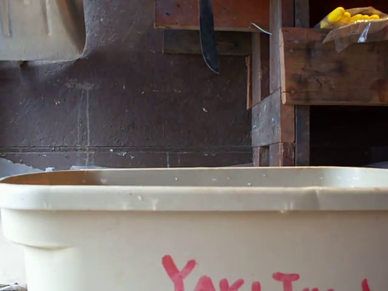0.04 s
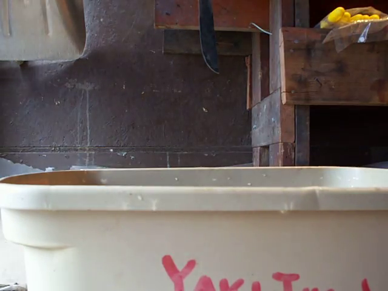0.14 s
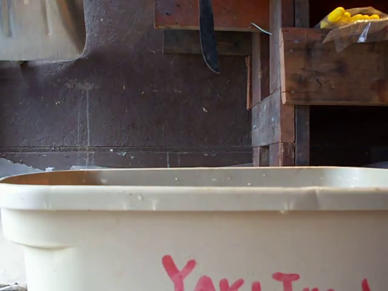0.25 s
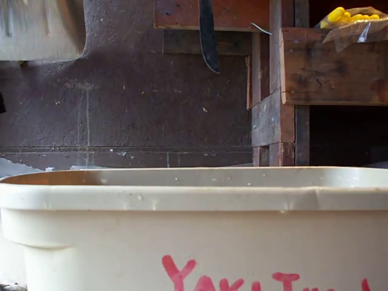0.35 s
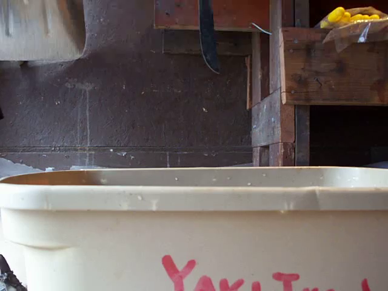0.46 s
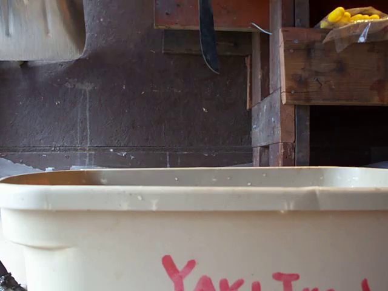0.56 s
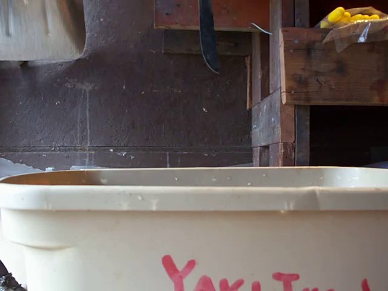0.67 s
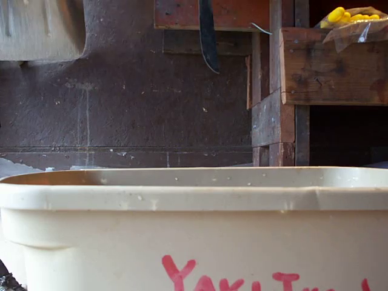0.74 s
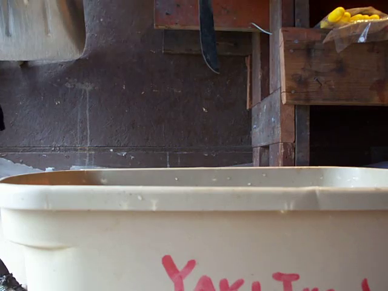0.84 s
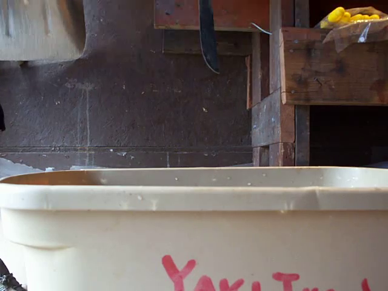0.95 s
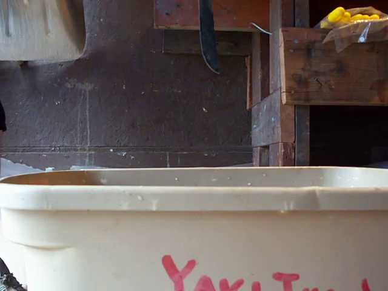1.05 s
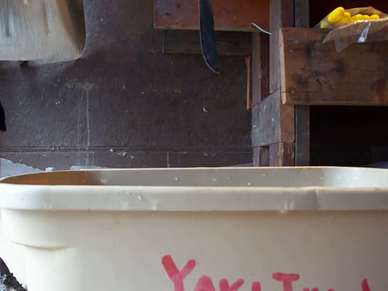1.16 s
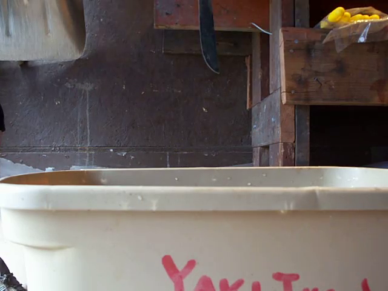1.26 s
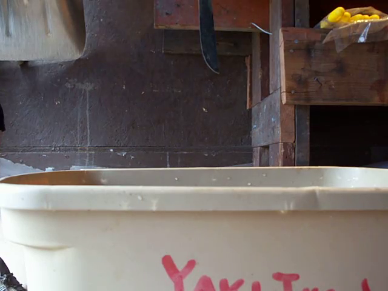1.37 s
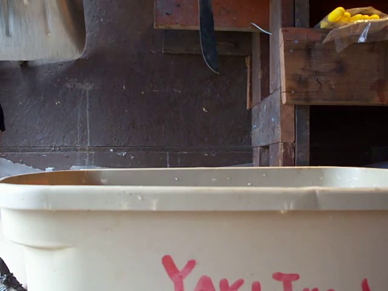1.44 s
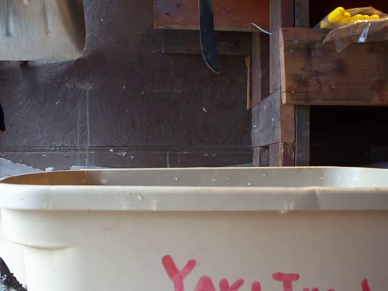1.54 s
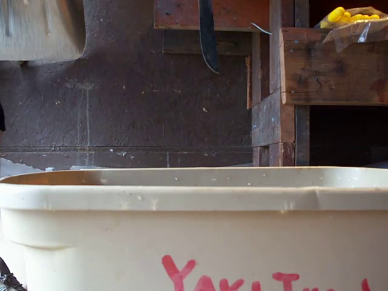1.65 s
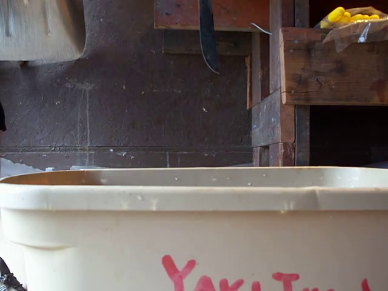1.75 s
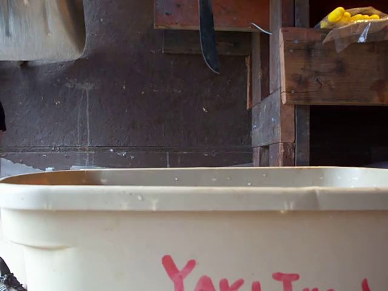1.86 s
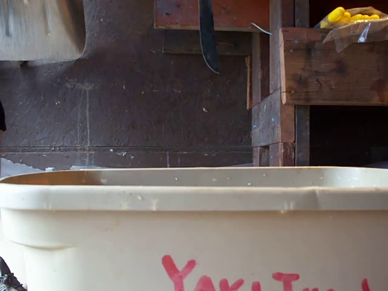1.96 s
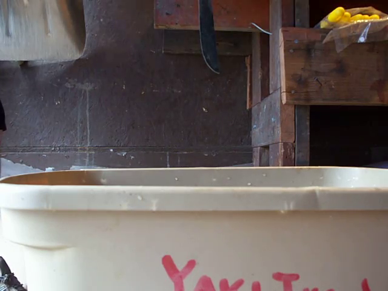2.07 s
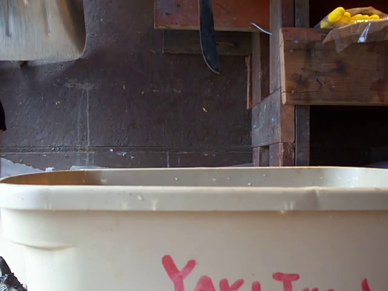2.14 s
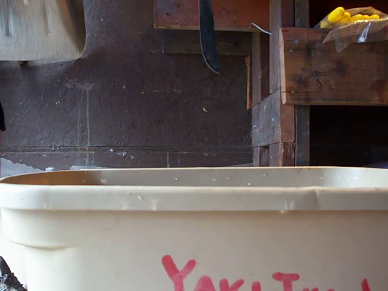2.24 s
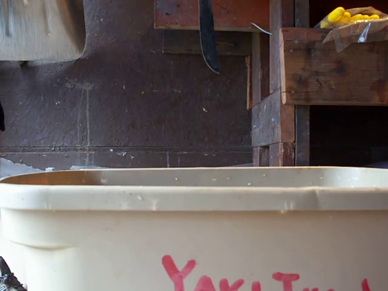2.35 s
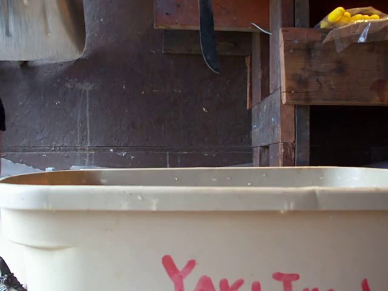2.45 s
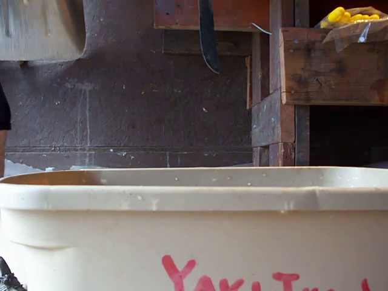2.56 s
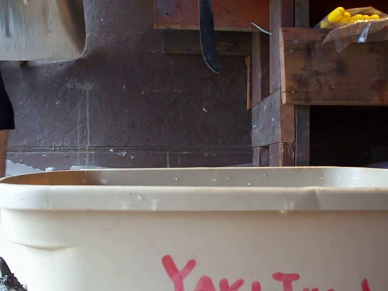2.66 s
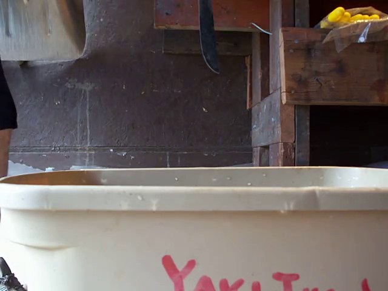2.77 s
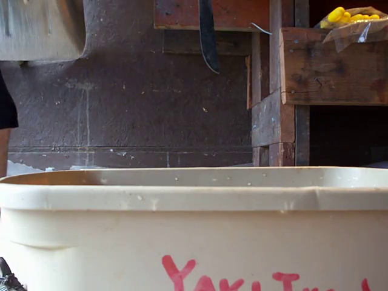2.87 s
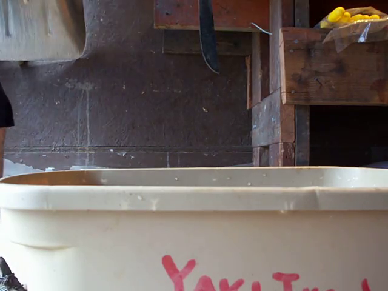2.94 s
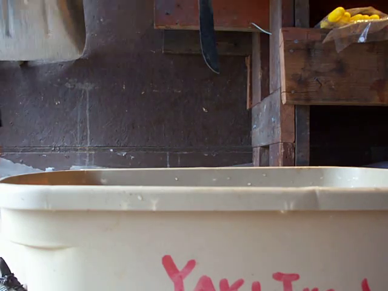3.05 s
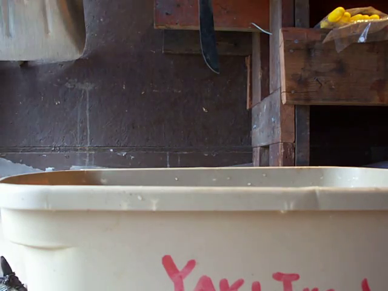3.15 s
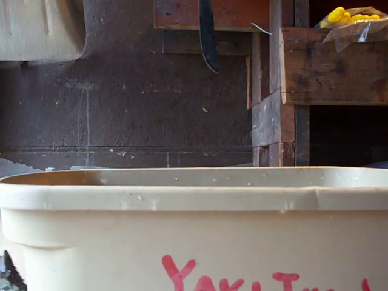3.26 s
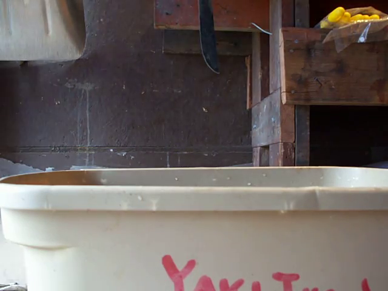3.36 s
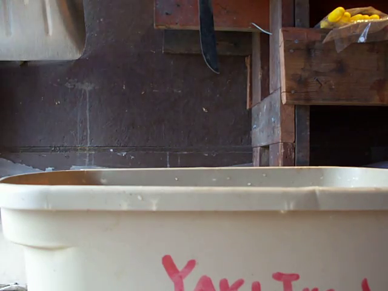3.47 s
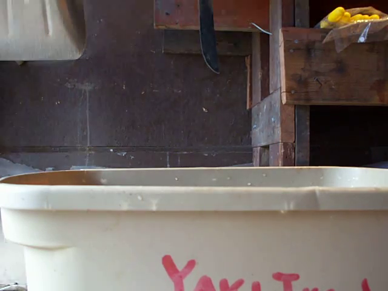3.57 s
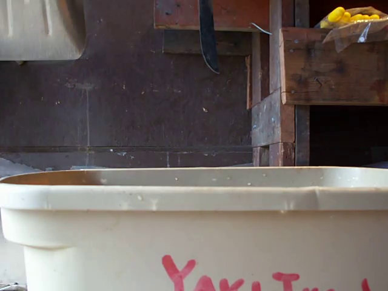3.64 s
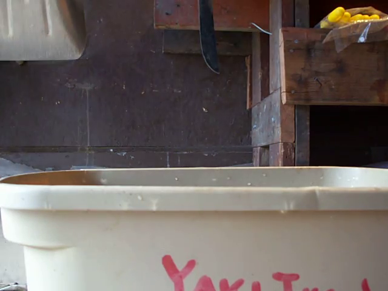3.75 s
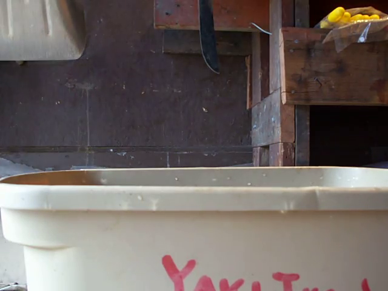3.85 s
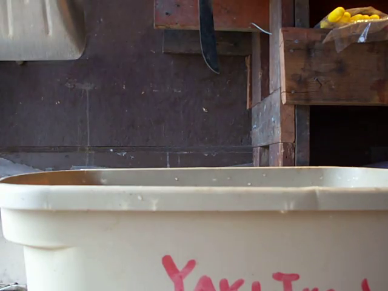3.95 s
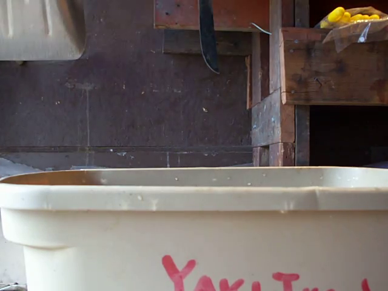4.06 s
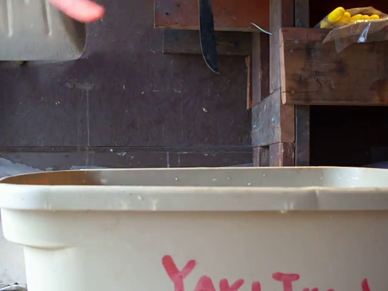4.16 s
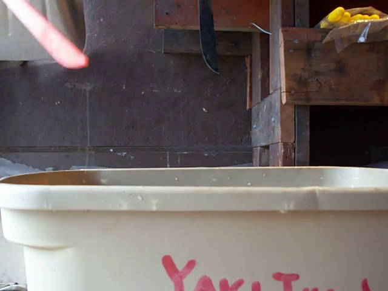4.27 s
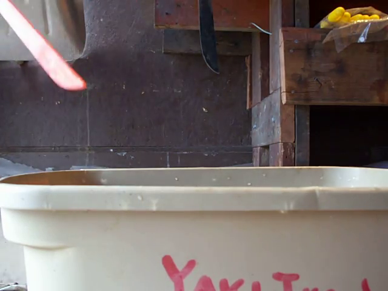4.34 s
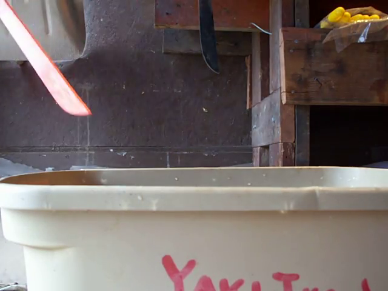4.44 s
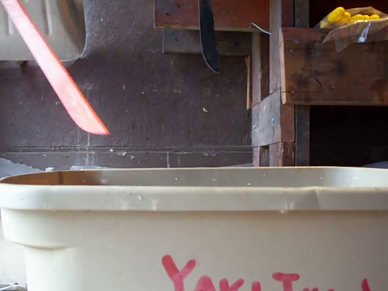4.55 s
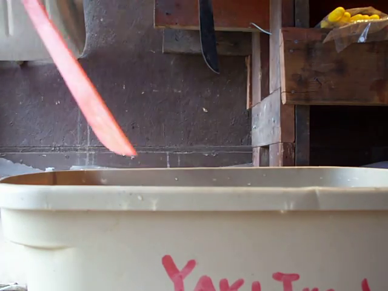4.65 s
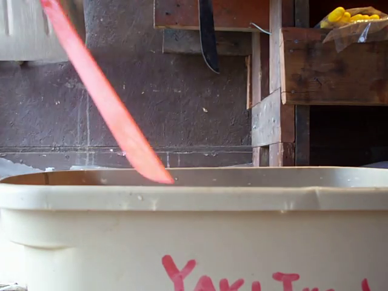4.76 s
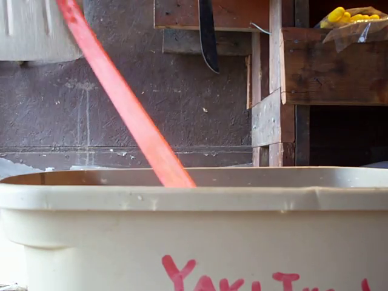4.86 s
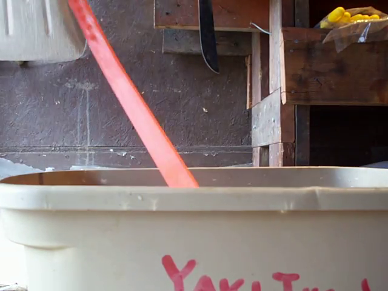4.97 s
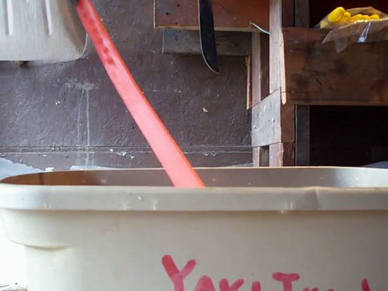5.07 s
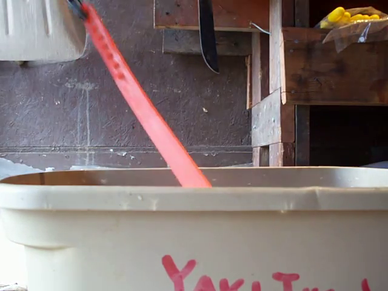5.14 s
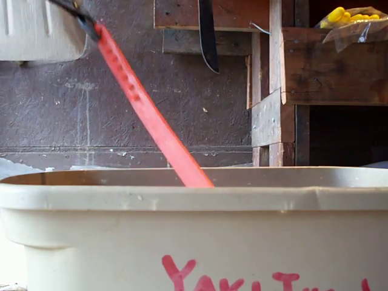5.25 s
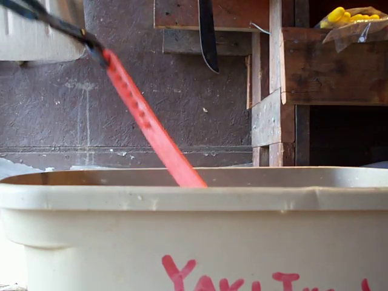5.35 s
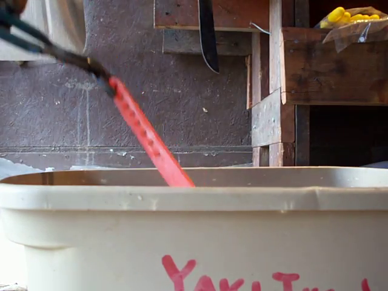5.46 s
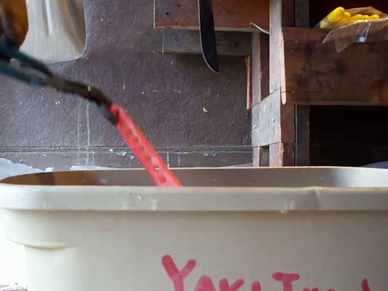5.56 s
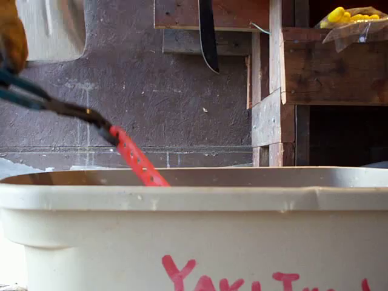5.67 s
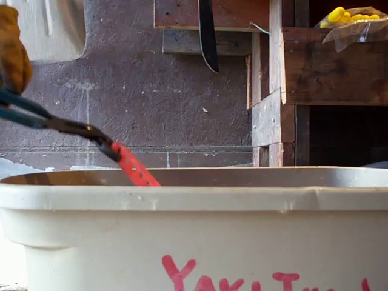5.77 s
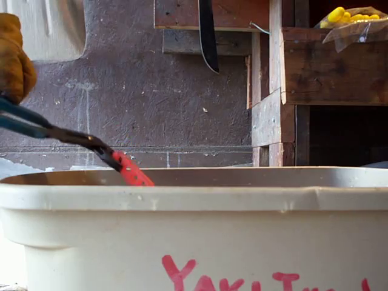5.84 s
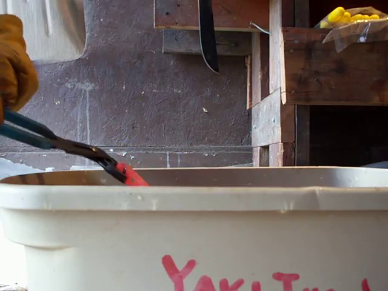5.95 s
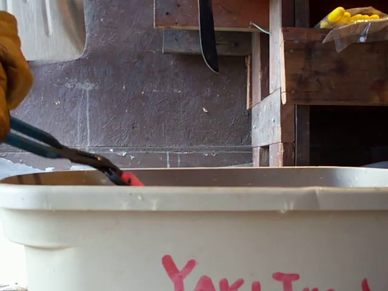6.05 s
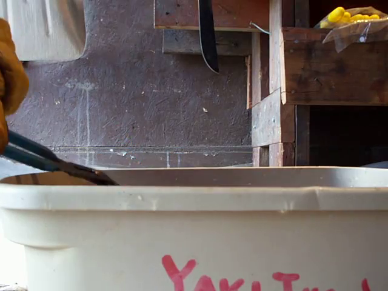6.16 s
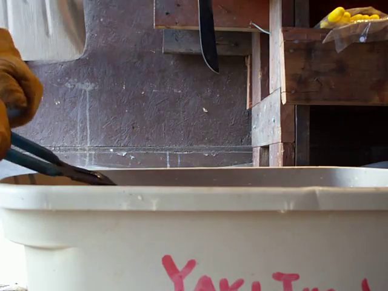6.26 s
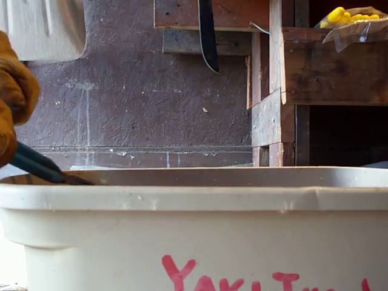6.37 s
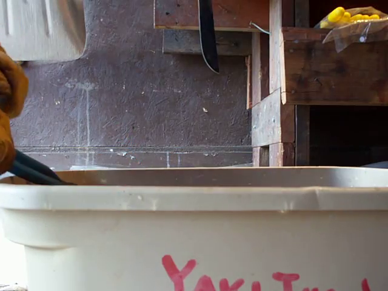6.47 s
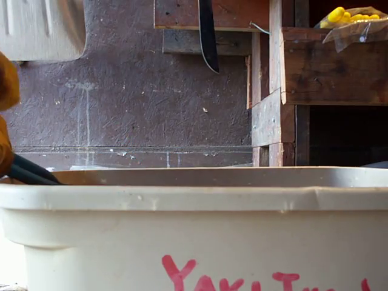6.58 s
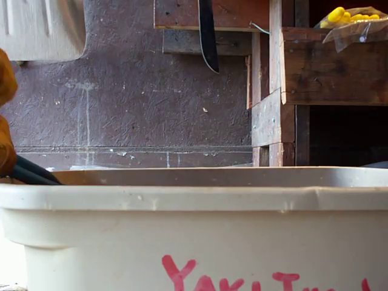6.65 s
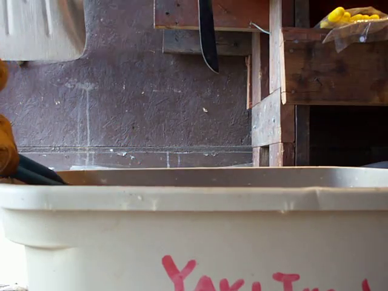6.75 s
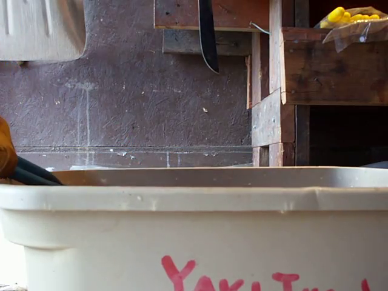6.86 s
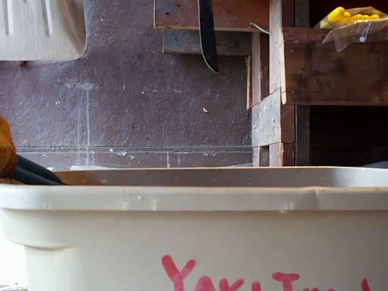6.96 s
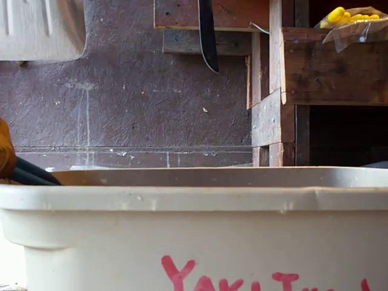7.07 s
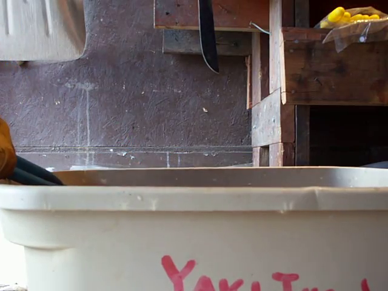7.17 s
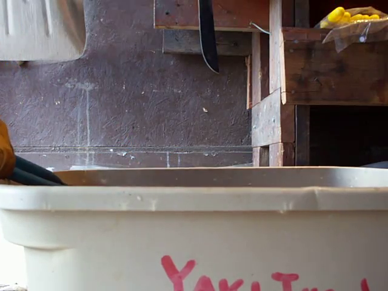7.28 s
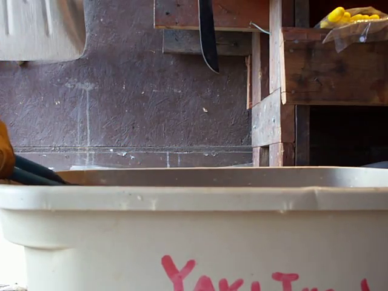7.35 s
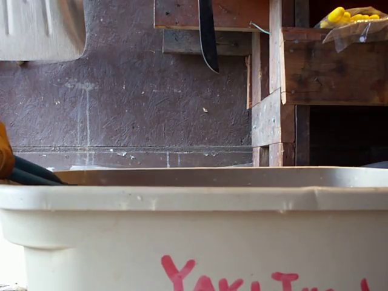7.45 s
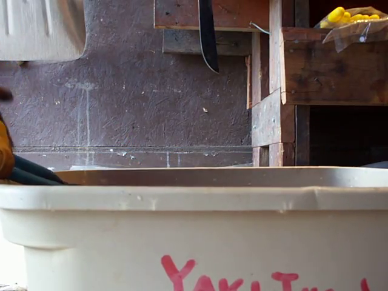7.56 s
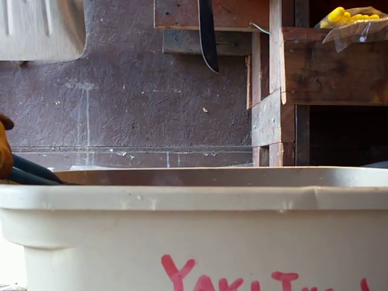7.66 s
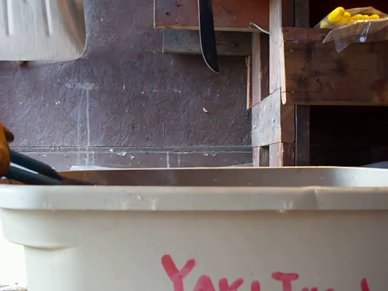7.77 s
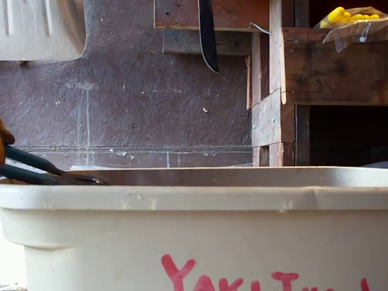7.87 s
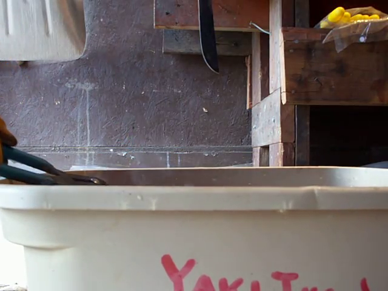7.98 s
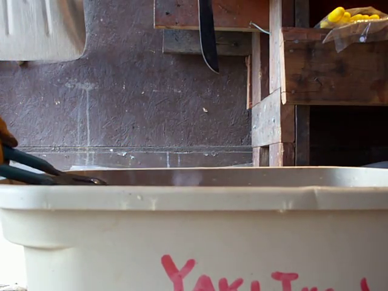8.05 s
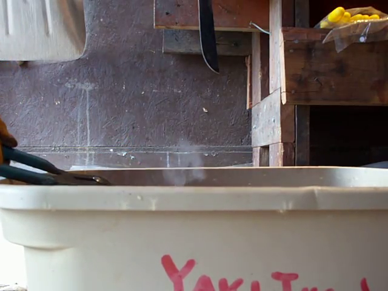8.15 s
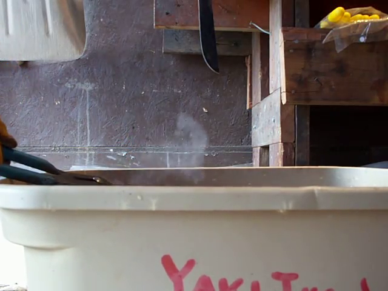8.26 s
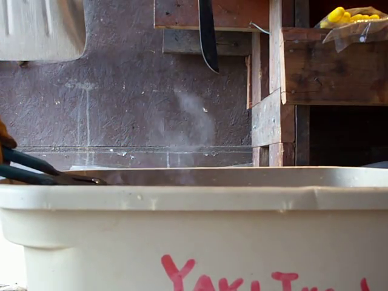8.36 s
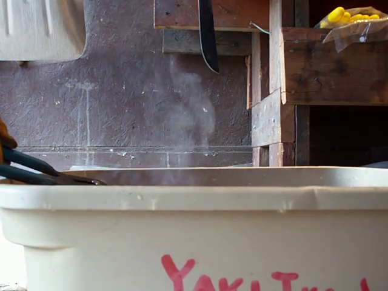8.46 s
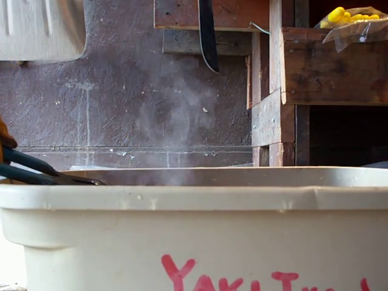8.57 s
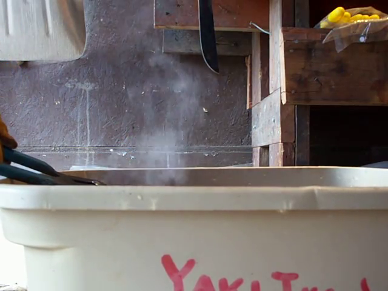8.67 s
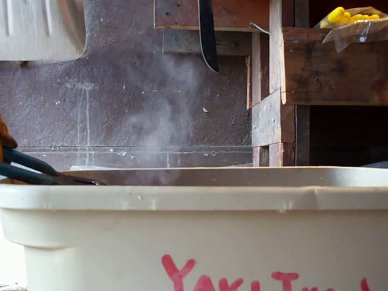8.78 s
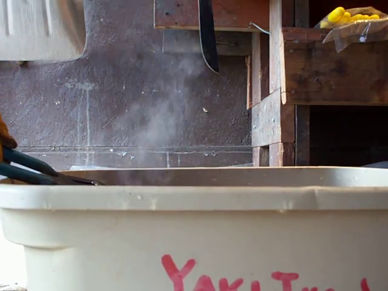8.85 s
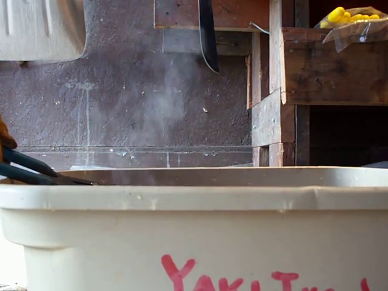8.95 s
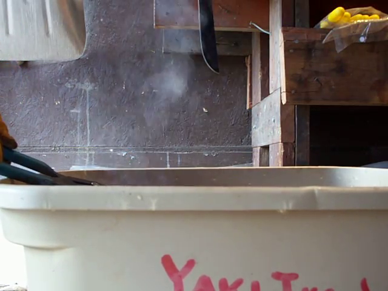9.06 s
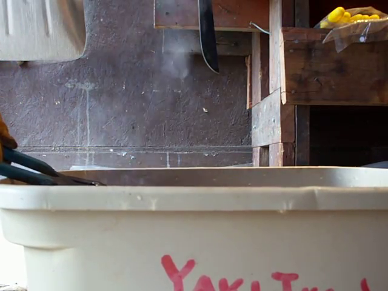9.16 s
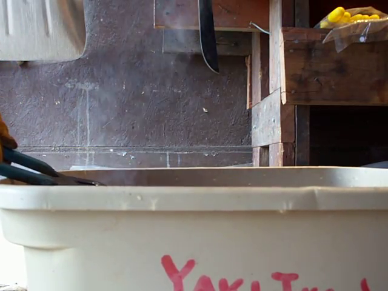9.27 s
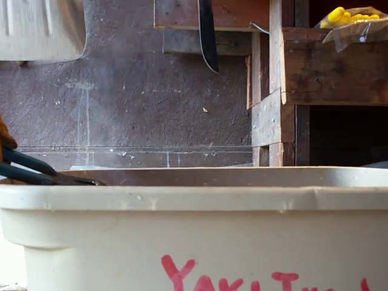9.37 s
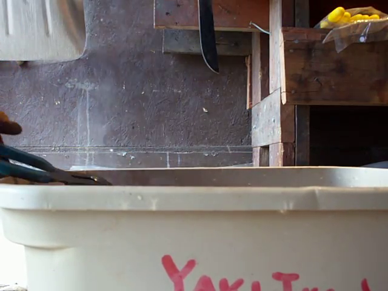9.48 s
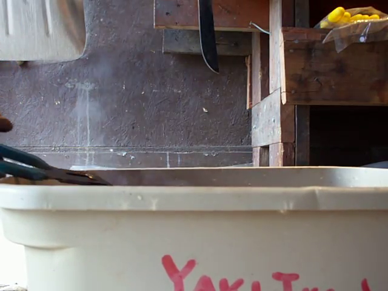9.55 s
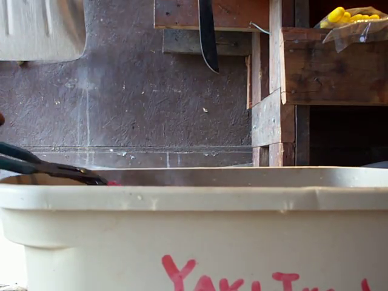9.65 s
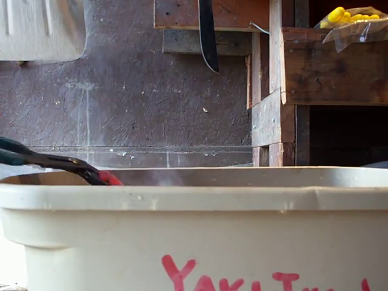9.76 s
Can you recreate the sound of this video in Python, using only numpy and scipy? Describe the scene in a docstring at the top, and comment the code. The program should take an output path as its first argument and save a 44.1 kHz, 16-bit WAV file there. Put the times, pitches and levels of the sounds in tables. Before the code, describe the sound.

In a small workshop, motors throb low while light knocks, rustling gloves and clanking steel tongs are heard close. A forge door bumps open, fire rushes softly, then the door slams hard. After a few knocks a hot blade enters brine with a thin sizzle, gargles and squeals, then bursts into a loud, crackling, hissing boil lasting to the end. Mono, close microphone with dulled top treble.

```python
"""Quenching a hot blade

A red-hot blade slides into brine: ringing tones and shaped noise make its steam film sizzle, gargle and squeal;
the film collapses, and clouds of short bubble tones boil on the steel with a loud hiss.
Before that, a forge (crackling noise) is opened, roars and is shut with a thud, and steel tongs clank (ringing modes).
Motors (steady tones) hum and beat behind it all, heard by one close microphone in a small room."""
import sys
import numpy as np
from scipy import signal
from scipy.fft import rfft, irfft, next_fast_len
from scipy.io import wavfile
from scipy.ndimage import uniform_filter1d, map_coordinates

SR = 44100
rng = np.random.default_rng(int(sys.argv[2]) if len(sys.argv) > 2 else 0)


def waveform_to_disk(signal):
    """Save audio, clipped to [-1, 1], as 16-bit WAV at the path in sys.argv[1]."""
    frames = np.transpose(np.atleast_2d(signal))
    scaled = np.clip(frames, -1, 1) * 32767
    samples = np.round(scaled).astype(np.int16)
    wavfile.write(sys.argv[1], SR, samples)


N = 432826  # length in samples


def amp(db):
    """Turn decibels into a gain."""
    return 10 ** (np.asarray(db) / 20)


def unit(x):
    """Scale x to rms 1."""
    return x / np.sqrt(np.mean(x ** 2) + 1e-20)


def clock(size):
    """The time of each sample in seconds."""
    return np.arange(size) / SR


def along(points, hz):
    """Read a curve of (f/Hz, value) points on a log frequency axis."""
    f, value = np.transpose(points)
    return np.interp(np.log(hz + 1), np.log(f + 1), value)


def levels(rows, fade=0.071):
    """A gain per sample for each dB column; fades in and out at the ends, silent outside the rows."""
    s, *columns = np.transpose(rows)
    t = clock(N)
    gate = np.clip(1 + np.minimum(t - s[0], s[-1] - t) / fade, 0, 1)
    return [gate * amp(np.interp(t, s, column)) for column in columns]


def stroke(start_s, length_s, attack_s, release_s):
    """An envelope: linear attack, hold, then a release that loses 20 dB in release_s."""
    t = clock(N) - start_s
    return np.clip(t / attack_s, 0, 1) * amp(-20 * np.clip((t - length_s) / release_s, 0, 10))


def noise(size=N):
    """Plain hiss, equally strong at all frequencies."""
    return rng.standard_normal(size)


def wobble(rate):
    """A smooth random curve around zero, with rate knots a second."""
    knots = rng.standard_normal(int(N * rate / SR) + 4)
    return map_coordinates(knots, [clock(N) * rate])


def filtered(x, response):
    """Shape x by a function of frequency."""
    m = next_fast_len(len(x) + 8192)  # spare room for the filter's tail
    return irfft(rfft(x, m) * response(np.fft.rfftfreq(m, 1 / SR)), m)[:len(x)]


def coloured(x, spectrum):
    """Shape x by a spectrum of (f/Hz, level/dB) points, at rms 1."""
    return unit(filtered(x, lambda hz: amp(along(spectrum, hz))))


def resonant(x, peaks):
    """Send x through resonances (f/Hz, width/Hz, level/dB), at rms 1."""
    def response(f):
        total = 0
        for k, (centre, width, db) in enumerate(peaks):
            peak = 1j * f * width / (centre * centre - f * f + 1j * f * width)
            total = total + (-1) ** k * amp(db) * peak  # neighbours have opposite signs
        return total
    return unit(filtered(x, response))


def patchy(x, depth_db, size_f, size_t):
    """Make x louder and softer in random patches of time and frequency."""
    z = signal.stft(x, nperseg=512)[2]
    field = rng.standard_normal(z.shape)
    field = uniform_filter1d(uniform_filter1d(field, size_f, 0), size_t, 1)
    return signal.istft(z * amp(depth_db * unit(field)), nperseg=512)[1][:N]


def add(track, s, sound):
    """Mix a sound into the track at time s."""
    part = track[max(round(s * SR), 0):][:len(sound)]
    part += sound[:len(part)]


def ring(modes, t, longest):
    """Struck modes die away, each at a slightly random strength; longest caps their t60; peak 1."""
    y = 0
    for hz, db, t60 in modes:
        decay = amp(db + rng.normal(0, 0.75) - 60 * t / min(t60, longest))
        y = y + decay * np.sin(2 * np.pi * hz * t) * rng.choice([-1, 1])
    return y / np.abs(y).max()


def contact(t, mid_db, high_db, t60, crack_db, bass_db):
    """A blow as shaped noise: a short crack together with a slower decay."""
    shape = [(150, bass_db - 7), (480, bass_db), (900, 0.014), (2000, mid_db - 5),
             (4300, high_db - 4.5), (6500, high_db - 4), (8000, high_db - 21.5)]
    decay = amp(-60 * t / max(t60, .02)) + amp(crack_db - 60 * t / 0.061)
    return coloured(noise(len(t)), shape) * decay


def bubbles(rate, pitch_hz, spread, cycles, scatter_db, rise):
    """A cloud of rate bubbles a second, each a short damped tone that rises as it nears the surface."""
    count = int(rate * N / SR)
    hz = pitch_hz * np.exp(spread * rng.standard_normal((count, 1)))
    hz = np.clip(hz, pitch_hz / 3, TOP_HZ)
    start = rng.integers(0, N, (count, 1))
    k = np.arange(int(3 * cycles * SR / pitch_hz))
    age = hz * k / SR / cycles
    strength = amp(scatter_db * np.minimum(rng.exponential(size=(count, 1)), 4))
    waves = strength * np.exp(-2 * age) * np.sin(2 * np.pi * cycles * age * (1 + rise * age))
    return unit(np.bincount((start + k).ravel(), waves.ravel(), N)[:N])


# how long the room rings on: (f/Hz, t60/s)
ROOM = [(150, 0.23), (1000, 0.34), (4000, 0.22), (8000, 0.23)]


def room(x, wet_db):
    """Add the answer of the workshop's walls: noise that dies away at its own pace in each band."""
    hz, t, z = signal.stft(noise(SR // 2), SR, nperseg=256)
    decay = amp(-60 * t / along(ROOM, hz)[:, None])
    tail = signal.istft(z * decay, SR, nperseg=256)[1]
    tail *= np.clip(clock(len(tail)) / 0.014, 0, 1)
    return x + amp(wet_db) * signal.fftconvolve(x, tail / np.linalg.norm(tail))[:len(x)]


PLUNGE_S, COLLAPSE_S, LIFT_S = 5.762, 6.25, 9.38  # bubbles start; the film collapses; the blade is drawn up
CHURN_DB, CHURN_RISE_S = -30, 1  # large bubbles build up
CHURN_SAG_DB, CHURN_SAG_S = 8, 1.08  # extra level that dies away after the collapse
CRACKLE_DB, FIZZ_DB = -29, -28  # base levels at the height of the boil
HEIGHT_S, BUILD_DB_PER_S = 7.65, 2.5  # the boil spreads along the blade until its height
CRACKLE_COOL_DB_PER_S, FIZZ_COOL_DB_PER_S = 2.5, 0.5  # then fades as the steel cools
LIFT_DB, LIFT_FOR_S = 5, 0.26  # fizz lost as the blade rises
# flares of steam as patches of film let go, and a lull:
# (peak t/s, half width t/s, fizz gain level/dB, crackle gain level/dB)
FLARES = [(6.315, .07, 8.5, 1.5), (6.39, 0.066, 1.5, 5), (6.55, 0.063, 3.5, -0.5), (6.98, 0.079, 2, -1.5),
          (7.63, .07, 0.5, 0.5), (8.118, 0.014, 2.5, 4), (8.41, 0.12, 1.5, 1.5), (8.85, 0.033, 1.5, 1),
          (9.04, 0.14, -1, -1.5), (9.17, 0.028, -1.5, 5), (9.235, 0.037, 4.5, 3.5)]


def boil_levels():
    """Gains of churn, crackle and fizz: the boil builds, flares here and there, and fades as the steel cools."""
    t = clock(N)
    since_collapse_s = np.maximum(t - COLLAPSE_S, 0)
    churn_db = CHURN_DB + CHURN_SAG_DB * np.exp(-since_collapse_s / CHURN_SAG_S)
    churn = np.clip((t - PLUNGE_S) / CHURN_RISE_S, 0, 1) * amp(churn_db)
    wetted = np.clip((t - COLLAPSE_S) / 0.027, 0, 1) * amp(-BUILD_DB_PER_S * np.maximum(HEIGHT_S - t, 0))
    cooling_s = np.maximum(t - HEIGHT_S, 0)
    crackle_db = CRACKLE_DB - CRACKLE_COOL_DB_PER_S * cooling_s
    lift = np.clip((t - LIFT_S) / LIFT_FOR_S, 0, 1)
    fizz_db = FIZZ_DB - FIZZ_COOL_DB_PER_S * cooling_s - LIFT_DB * lift
    for s, width_s, fizz_gain_db, crackle_gain_db in FLARES:
        flare = np.exp(-((t - s) / width_s) ** 2)
        crackle_db = crackle_db + crackle_gain_db * flare
        fizz_db = fizz_db + fizz_gain_db * flare
    crackle = wetted * amp(crackle_db + 0.35 * wobble(13))
    fizz = wetted * amp(fizz_db + 0.26 * wobble(15))
    return churn * amp(1.4 * wobble(14)), crackle, fizz


# colour of the large bubbles in the tub: (f/Hz, level/dB)
TUB = [(53, -58), (90, -15.5), (189, -4.5), (253, -10.5), (392, -14.5), (422, -6.5), (525, -8.5),
       (800, -10.5), (1040, -48.5), (1760, -120)]
# resonances of the tub: (f/Hz, width/Hz, level/dB)
TUB_MODES = [(176.7, 64, -2), (199, 26.4, 2), (222.6, 15, -2.5), (282.5, 10.8, -1.5), (318.7, 18, -3.5),
             (376.7, 8.1, -2), (396.6, 6.9, 0), (480.5, 30, -8), (531.4, 32, -6.5)]
# colour of the crackle on hot, then cooler steel: (f/Hz, level/dB)
CRACKLE = [(410, -27.5), (700, -8), (805, -18.5), (872, -4.5), (973, 0.5), (1080, -9), (1440, -2),
           (1570, -10.5), (1710, -4), (1910, -6.5), (2230, -1), (2640, -3), (3000, -0.5), (3900, -24),
           (6600, -120)]
CRACKLE_COOL = [(410, -24), (700, -6.5), (810, -18), (915, -1), (1010, -7.5), (1110, -3), (1440, -3),
                (1570, -12), (1710, -3), (1960, -4.5), (2230, -3.5), (2590, -7.5), (3000, -6), (3900, -44),
                (6600, -120)]
# resonances of the air above the brine: (f/Hz, width/Hz, level/dB)
RIM_MODES = [(888, 31, 1.5), (929, 14, -8.5), (1088, 17, 2.5), (1419, 27, -3), (1702, 35, -2.5),
             (2088, 20, 3), (2305, 14, 2.5)]
# colour of the fizz on hot, then cooler steel: (f/Hz, level/dB)
FIZZ = [(1590, -39), (2700, -11), (3560, -1), (3930, -7), (4620, -3), (5160, -4.5), (5670, -2), (6590, -4),
        (6930, -5), (7360, -9), (8100, -23), (8510, -11.5), (8950, -22.5), (11600, -73), (19700, -120)]
FIZZ_COOL = [(1590, -34), (2700, -18.5), (3140, -2.5), (3350, -5.5), (3680, -8), (4160, -5), (4780, -3.5),
             (5210, -3), (6590, -2), (7360, -8.5), (8100, -21), (8510, -11.5), (8950, -25.5), (11600, -73),
             (19700, -120)]
# resonances in the fizz: (f/Hz, width/Hz, level/dB)
FIZZ_MODES = [(3470, 49, 0.5), (3784, 71, -2), (4175, 70, 4.5), (4420, 53, -1), (4527, 49, 2.5),
              (5580, 30, -6.5), (6610, 22, 5.5)]


def boiling():
    """The film collapses: large bubbles churn in the tub, small ones crackle and fizz on the steel."""
    churn, crackle, fizz = boil_levels()
    surge = wobble(45)
    # the mix of bubble sizes shifts as the steel cools
    cool = np.interp(clock(N), [7, 8.8], [0, 1])

    gulps = noise() + amp(-7.5) * bubbles(260, 276.6, 0.506, 7.0, 1.1, 0.057)
    large = amp(-4.5) * coloured(gulps, TUB) + amp(-4.5) * resonant(noise(), TUB_MODES)

    bursts = noise() + amp(-6) * bubbles(1800, 1693, 0.481, 5.2, 3.1, 0.046)
    bursts = patchy(bursts, 1.4, size_f=2, size_t=8)
    middle = (1 - cool) * coloured(bursts, CRACKLE) + cool * coloured(bursts, CRACKLE_COOL)
    middle = middle + amp(-6.5) * resonant(noise(), RIM_MODES)

    spray = noise() + amp(-6) * bubbles(4000, 4970, 0.45, 3, 4.2, 0.035)
    spray = patchy(spray, 1.9, size_f=2, size_t=16)
    small = (1 - cool) * coloured(spray, FIZZ) + cool * coloured(spray, FIZZ_COOL)
    small = small + amp(-6) * resonant(noise(), FIZZ_MODES)

    crackling = amp(-0.5 + 0.75 * surge) * crackle * middle
    fizzing = amp(0.16 + 0.76 * surge) * fizz * small
    return churn * large + crackling + fizzing


def pocket(rows, rough, flutter_rate, wander):
    """A vapour pocket rings along a pitch curve; pitch and strength flutter as its wall shakes."""
    s, hz, db = np.transpose(rows)
    gain, = levels(np.transpose([s, db]), fade=.01)
    pitch = np.interp(clock(N), s, hz) * (1 + wander * wobble(flutter_rate))
    tone = np.sin(2 * np.pi * np.cumsum(pitch) / SR)
    return gain * unit((1 + rough * wobble(flutter_rate)) * tone)


POCKET_ATTACK_S, POCKET_RELEASE_S = 0.01, 0.032
POCKET_SETTLE = .35  # pitch settling time as a share of the length
POCKET_ROUGH, FLUTTER_PER_S = .5, 220  # depth of the loudness flutter, and its random knots a second
# ringing vapour pockets, from thin whistles to glugs and squeals:
# (start t/s, length t/s, first f/Hz, last f/Hz, level/dB, pitch wander as a share)
POCKETS = [(5.3, .6, 4560, 5020, -65, .012), (5.498, 0.54, 3870, 3990, -60.5, 0.01),
           (5.828, 0.22, 4930, 4950, -54, .008), (5.872, .016, 940, 970, -29, .06),
           (5.923, 0.087, 1002, 962, -35.5, 0.094), (6.013, 0.02, 906, 716, -31.5, 0.13),
           (6.016, 0.017, 380, 355, -24.5, .07), (6.03, 0.19, 4010, 3850, -40.5, 0.013),
           (6.051, 0.037, 337, 371.4, -21, 0.054), (6.109, 0.055, 331, 382, -24, .13),
           (6.117, 0.078, 1820, 1680, -36.5, 0.018), (6.17, 0.013, 368, 350, -15, .1),
           (6.199, 0.19, 326.7, 276, -32, 0.13), (6.335, 0.079, 1710, 1130, -22, .045),
           (6.451, 0.0406, 1287, 934, -31, 0.038)]


def pockets():
    """Short-lived vapour pockets ring; each glides to its last pitch as it takes its size."""
    out, t = np.zeros(N), clock(SR)
    for s, length, first_hz, last_hz, db, wander in POCKETS:
        shake, swell = (map_coordinates(noise(1024), [t * FLUTTER_PER_S]) for _ in range(2))
        settling = np.exp(-(t / (POCKET_SETTLE * length)) ** 2)
        pitch = last_hz + (first_hz - last_hz) * settling
        phase = 2 * np.pi * np.cumsum(pitch * (1 + wander * shake)) / SR
        tone = (1 + POCKET_ROUGH * swell) * np.sin(phase)
        envelope = stroke(0, length, POCKET_ATTACK_S, POCKET_RELEASE_S)[:len(t)]
        add(out, s, amp(db) * envelope * unit(tone))
    return out


# the first thin sizzle: (t/s, level/dB)
TIP = [(5.05, -64), (5.434, -65), (5.53, -59.5), (5.816, -53.5), (5.9, -42)]
# its colour: (f/Hz, level/dB)
TIP_COLOUR = [(1470, -48), (2500, -15), (2950, -10), (3220, -4), (3580, -16), (3730, -8), (3910, 0),
              (4620, -5), (5010, -17), (5320, -8), (5450, -7), (6060, 4), (7260, -6.5), (7470, -6),
              (8000, -38), (10400, -61), (17600, -120)]
# its resonances: (f/Hz, width/Hz, level/dB)
TIP_MODES = [(3190, 90, -1), (3830, 73, -4), (5100, 46, 9), (5250, 76, -9), (6120, 79, -1.5),
             (6980, 150, 2.5)]
# the flutter of the steam film: (t/s, level/dB)
JACKET = [(5.76, -64), (5.804, -51), (5.874, -39.5), (5.894, -40), (6.176, -30.5), (6.25, -32.5)]
# its colour: (f/Hz, level/dB)
JACKET_COLOUR = [(290, -21), (500, -10), (597, -10), (689, 5), (813, -10.5), (1010, -3), (1490, -16),
                 (1720, 6), (1840, -6), (2720, -8), (3890, -2.5), (4590, -14), (6100, -2), (7030, -26),
                 (8500, -43), (11000, -66), (18700, -120)]
# its resonances: (f/Hz, width/Hz, level/dB)
JACKET_MODES = [(957, 200, -4), (1400, 120, 1.5), (1706, 58, -8), (1900, 70, 1), (2495, 58, -1.5),
                (4370, 160, -4.5), (4970, 200, -9.5), (5300, 170, -22.5), (6840, 710, -8)]
# a deep vapour pocket: (t/s, pitch f/Hz, level/dB)
MURMUR = [(5.2, 270.8, -53), (5.95, 235.5, -38.5), (6.12, 238.8, -28), (6.72, 205, -30.5),
          (7.0, 193.5, -42)]
# a hoarse jet of steam: (t/s, pitch f/Hz, level/dB)
GUSH = [(6.62, 1675, -40), (6.78, 1788, -37.5), (6.88, 2140, -33), (7.0, 2323, -44)]


def vapour_jacket():
    """A film of steam wraps the glowing steel: first a thin sizzle, then a ringing flutter."""
    tip, = levels(TIP, fade=0.08)
    thin = amp(-2.5) * coloured(noise(), TIP_COLOUR) + amp(-5.5) * resonant(noise(), TIP_MODES)
    sizzle = amp(4 + 3.4 * wobble(60)) * tip * thin

    jacket, = levels(JACKET, fade=0.033)
    ringing = resonant(patchy(noise(), 1.5, size_f=3, size_t=12), JACKET_MODES)
    steam = amp(-1.5) * coloured(noise(), JACKET_COLOUR) + amp(-3.0) * ringing
    flutter = amp(1.5 + 0.79 * wobble(90)) * jacket * steam

    deep = amp(-7) * pocket(MURMUR, 0.81, 70, .13)
    jet = pocket(GUSH, 0.32, 500, .13)
    return sizzle + flutter + room(deep + jet, wet_db=1.5) + room(pockets(), wet_db=-8)


TICKS_PER_S, TICKS_DB = 400, -4  # dry crackle in the fire's rush
FLICKER_DB, FLICKER_PER_S = 1.5, 25
# the fire's roar: (t/s, level/dB)
FORGE = [(2.45, -56), (2.82, -55), (3.15, -55.5), (3.32, -50), (3.97, -40.5), (4.09, -48.5), (4.47, -46),
         (4.76, -58.5), (5.3, -62)]
# its colour: (f/Hz, level/dB)
FLAME = [(250, -30), (420, 1.5), (554, 0.5), (605, -3), (1030, -1), (1340, -3.5), (1500, -0.5), (2450, -6),
         (2740, -6), (5900, -9.5), (7130, -12), (8500, -28), (11000, -75), (18700, -120)]


def forge():
    """The fire's rush, patchy noise with random ticks, swells while the door is open."""
    roar, = levels(FORGE, fade=0.12)
    ticks = unit((rng.random(N) < TICKS_PER_S / SR) * noise())
    rush = patchy(noise(), 2.2, size_f=8, size_t=8) + amp(TICKS_DB) * ticks
    flicker = amp(-0.5 + FLICKER_DB * wobble(FLICKER_PER_S))
    return roar * flicker * coloured(rush, FLAME)


DOOR_T60_S, PANEL_T60_S = 0.18, .16  # the first also caps the decay of the door's modes
# blows of the forge door: (t/s, level/dB, crack level/dB, boom level/dB, clap level/dB)
THUDS = [(3.394, -15, -17, -10, -3.5), (3.45, -21.5, -30, -3, -11.5), (4.376, -4.5, -4, -12.5, -13.5),
         (4.382, -4.5, -12.5, -8, -18), (4.406, -16.5, -23, -11, -21.5)]
# the door's ringing modes: (f/Hz, level/dB, t60/s before the cap)
DOOR = [(135, -5, 0.12), (190, -14, 0.17), (229, -1.5, 0.25), (280, -2, 0.17), (381.5, -3.5, 0.19),
        (425.5, -7, 0.18), (546, -7, 0.17), (602, -2.5, 0.17), (756, -16.5, 0.21), (893, -19.5, .2),
        (1110, -27, 0.14), (1214, -21, .19)]
# colour of its dull body: (f/Hz, level/dB)
DOOR_BODY = [(40, -34), (70, -14.5), (150, -22.5), (270, -4.5), (400, -3.5), (540, -4.5), (700, -11),
             (900, -15), (1150, -29.5), (1400, -25), (2000, -22.5), (3200, -33), (6500, -35.5), (8000, -51)]
# the door's sheet face: (f/Hz, width/Hz, level/dB)
PANEL = [(675, 64, 4), (820, 210, -1)]


def door():
    """The heavy forge door bumps open, later slams and rebounds: modes ring amid bursts of noise."""
    out, t = np.zeros(N), clock(SR // 2)
    crack_colour = [(300, -20.5), (1100, 11.0), (2000, 2), (3500, -5), (7000, -27.5)]
    for s, db, crack_db, boom_db, clap_db in THUDS:
        body = amp(-11.0 - 60 * t / DOOR_T60_S) * coloured(noise(len(t)), DOOR_BODY)
        crack = amp(crack_db - 5.0 - 60 * t / 0.061) * coloured(noise(len(t)), crack_colour)
        panel = amp(clap_db - 7 - 60 * t / PANEL_T60_S) * resonant(noise(len(t)), PANEL)
        # where the blow lands sets the balance of low and middle modes
        balance = [(200, boom_db + 6.5), (300, boom_db + 10), (390, 0.0046),
                   (560, clap_db + 6), (950, clap_db + 11)]
        modes = [(hz, level + along(balance, hz), t60) for hz, level, t60 in DOOR]
        add(out, s, amp(db) * (amp(-5.0) * ring(modes, t, DOOR_T60_S) + body + crack + panel))
    # the slam pushes out one low puff of air
    add(out, 4.376, amp(-11) * ring([(85.5, 5, 0.069), (141, -3.5, 0.069)], t, .1))
    return room(out, wet_db=-16.5)


# the jaws slide along the bench; the bench itself sounds along with them
SCRAPE_S, SCRAPE_FOR_S, SCRAPE_DB, SCRAPE_BENCH_DB = 2.6, 0.655, -56.5, -45.5
# steel contacts: (t/s, level/dB, middle level/dB, treble level/dB)
CLANKS = [(1.78, -31.5, -15, -16), (2.319, -14.5, -13, 14), (2.328, -18.5, -8, -10.5),
          (2.668, -33.5, -3, 21), (3.174, -23, -6, 5.5), (3.271, -16, 6.5, 10.5), (3.296, -20, 13, 9),
          (4.662, -26, 13.5, 16)]
# ringing modes of the tongs: (f/Hz, level/dB, t60/s before a cap)
STEEL = [(917, 3.5, .1), (1270, -1, 0.17), (1680, -18.5, 0.24), (1970, 0.5, 0.16), (2290, -3, 0.28),
         (3950, 4.5, 0.11), (4050, -13, 0.19), (4230, 0, 0.17), (4940, -16.5, .2), (5100, -23, 0.24),
         (5300, -8, 0.17), (5640, -12, .2), (5300, -8, .2), (6280, -18.5, 0.2), (6600, -6, .18)]
# the tongs are pushed over the bench: (start t/s, length t/s, level/dB)
DRAGS = [(2.596, 0.046, -36.5), (2.662, 0.062, -38.5)]
# resonances of the scrape: (f/Hz, width/Hz, level/dB)
SCRAPE = [(2110, 85, -3), (3540, 71, -2), (4100, 150, -15), (5530, 120, -3.5), (5900, 80, -2.5),
          (6430, 90, -5), (6860, 130, -5.5)]


def tongs():
    """Steel tongs clank as their modes ring, and scrape along the bench as rough noise."""
    out, t = np.zeros(N), clock(SR // 2)
    blurred_modes = [(hz, 10 / life, level) for hz, level, life in STEEL]
    for s, db, mid_db, high_db in CLANKS:
        # the loose jaws chatter, which blurs each mode
        chatter = resonant(noise(len(t)), blurred_modes) * amp(-60 * t / 0.2)
        ringing = chatter + amp(3.5) * ring(STEEL, t, 0.23)
        body = contact(t, mid_db, high_db, t60=0.18, crack_db=1, bass_db=-5.5)
        # light touches hardly excite the modes
        add(out, s, amp(db - 18) * body + amp(1.94 * db - 3) * ringing)

    slide = stroke(SCRAPE_S, SCRAPE_FOR_S, 0.01, .1)
    pushes = sum(amp(db) * stroke(s, length, 0.031, 0.031) for s, length, db in DRAGS)
    bench = amp(SCRAPE_BENCH_DB) * slide + pushes
    bench_colour = [(120, -20), (230, -5.5), (300, -1.0), (400, -10.5), (650, -15), (1200, -24), (3000, -47.5)]
    drag = amp(-2 + 1.3 * wobble(40)) * bench * coloured(noise(), bench_colour)

    grit = resonant(patchy(noise(), 3.2, size_f=6, size_t=16), SCRAPE)
    scrape = amp(SCRAPE_DB + 1.3 * wobble(50)) * slide * grit
    return room(out, wet_db=-12.0) + drag + scrape


TAP_TAIL_DB, TAP_TAIL_T60_S = -16, 0.12  # the tapped thing rings on faintly
# knocks on wood and plastic: (t/s, level/dB, brightness tilt/dB)
KNOCKS = [(0.029, -33.5, 0.5), (0.222, -38.5, -1), (0.449, -35, -11), (0.942, -21, -5.5),
          (1.233, -29.5, -8), (1.527, -39, -3.5), (2.024, -34.5, -3), (3.521, -26, -2), (3.592, -26, 0),
          (3.991, -23, -0.5), (4.34, -24.5, 2), (4.525, -25, -6.5), (4.96, -33.5, -6), (5, -29, -3.5),
          (5.375, -22.5, -0.5)]
# one sharp dry tap: (t/s, level/dB)
TAP = [(4.078, -14.5)]
# its modes: (f/Hz, level/dB, t60/s before a cap)
TAPPED = [(866, -12, 0.022), (1390, 2.5, 0.013), (1740, 3, 0.012), (2150, -5, .01), (2860, -13, .008),
          (4380, -22, 0.013)]
# a small steel part tinkles: (t/s, peak level/dB before the room)
PINGS = [(1.779, -42), (1.86, -53)]
# its modes: (f/Hz, level/dB, t60/s)
PINGED = [(3940, 1, 0.062), (5100, 1, 0.067), (5270, -9, .14), (6520, -10, 0.09)]
# gloves rub: (start t/s, length t/s, level/dB)
RUSTLE = [(0.122, 0.21, -54.5), (0.368, 0.064, -50.5)]
# colour of the rubbing: (f/Hz, level/dB)
GLOVE = [(290, -38), (500, -7), (549, -13), (676, 3), (833, -7), (1190, -1.5), (6490, -12), (8000, -21),
         (10400, -63), (17600, -120)]


def knocks():
    """Gloves rustle; small things are moved and set down, some dull, some bright."""
    out, t = np.zeros(N), clock(SR // 2)
    for s, db, tilt_db in KNOCKS:
        knock = contact(t, 1.0 * tilt_db, 2.7 * tilt_db, t60=.2, crack_db=-5, bass_db=7.0)
        add(out, s, amp(db - 15) * knock)
    tail_colour = [(600, -16), (1300, -3), (2000, -3), (3500, -23), (7000, -43)]
    for s, db in TAP:
        tail = amp(TAP_TAIL_DB - 60 * t / TAP_TAIL_T60_S) * coloured(noise(len(t)), tail_colour)
        add(out, s, amp(db) * (amp(2) * ring(TAPPED, t, 0.023) + tail))
    for s, db in PINGS:
        add(out, s, amp(db) * ring(PINGED, t, .3))
    rub = sum(amp(db) * stroke(s, length, 0.044, 0.13) for s, length, db in RUSTLE)
    gloves = amp(2.7 * wobble(42)) * rub * coloured(noise(), GLOVE)
    return room(out, wet_db=-12.0) + gloves


OPEN_S, OPEN_FOR_S, OPEN_HUM_DB = 3.3, 1.1, 5.5  # the hum is louder while the forge door stands open
# motor tones: (f/Hz, level/dB)
MOTORS = [(47.12, -18), (48.97, -7), (56.66, 0), (97.96, -22), (113.32, -18), (169.96, -24)]
# the hum's rise and fall: (t/s, level/dB)
HUM = [(0, -36), (.85, -35), (1.3, -36), (2.25, -36.5), (2.5, -30.5), (3.2, -34.5), (4.6, -36),
       (5.95, -37.5), (6.55, -31), (7.25, -33.3), (8.85, -34), (9.55, -29.5)]
# colour of the rumble: (f/Hz, level/dB)
RUMBLE = [(15, -26.5), (27, -1), (36, -6), (60, 1), (90, -4.5), (125, -6.5), (160, -12), (210, -12),
          (260, -17), (380, -16), (480, -33.5), (900, -33.5), (2000, -90.5)]
# colour of the still air: (f/Hz, level/dB)
AIR = [(260, -34), (450, -7), (659, -11), (727, -16.5), (1060, -15.5), (1250, -21), (2550, -23),
       (8500, -28.5), (11000, -54), (18700, -120)]


def workshop():
    """Motors at slightly different speeds throb together over a rumble, a thin whine and still air."""
    hum = amp(np.interp(clock(N), *np.transpose(HUM)))
    hum = hum * amp(OPEN_HUM_DB * stroke(OPEN_S, OPEN_FOR_S, .1, .15))
    t = clock(N) - 5.135  # all tones are in step at this moment, apart from their small wobble
    tones = sum(amp(db) * np.sin(2 * np.pi * hz * t + .04 * wobble(2.8)) for hz, db in MOTORS)
    whine_phase = 2 * np.pi * 360.5 * t
    whine = amp(-53.0 + 1.5 * wobble(4)) * np.sin(whine_phase + .3 * wobble(3))
    # part of the rumble is steady, part follows the hum
    rumble = (amp(-47) + amp(-14.5) * hum) * coloured(noise(), RUMBLE)
    air = amp(-57.5) * coloured(noise(), AIR)
    return amp(3.0) * hum * tones + whine + rumble + air


def scene():
    """All sources together, the same on both channels."""
    mono = boiling() + vapour_jacket() + forge() + door() + tongs() + knocks() + workshop()
    return np.array([mono, mono])


TOP_HZ = 9050  # nothing passes above this; bubble pitches stop here too
# the microphone's treble roll-off: (f/Hz, level/dB)
MICROPHONE = [(7200, -0.5), (7600, -7.5), (7950, -15), (8400, -16), (8900, -18.5)]


def record(dry):
    """A narrow-band microphone channel that flattens the highest peaks and rolls off steeply in the treble."""
    clipped = dry / (1 + np.abs(dry / .7) ** 6) ** (1 / 6)

    def response(hz):
        return amp(along(MICROPHONE, hz)) * (hz < TOP_HZ)
    return np.array([filtered(x, response) for x in clipped])


dry = scene()
out = record(dry)
waveform_to_disk(out)
```